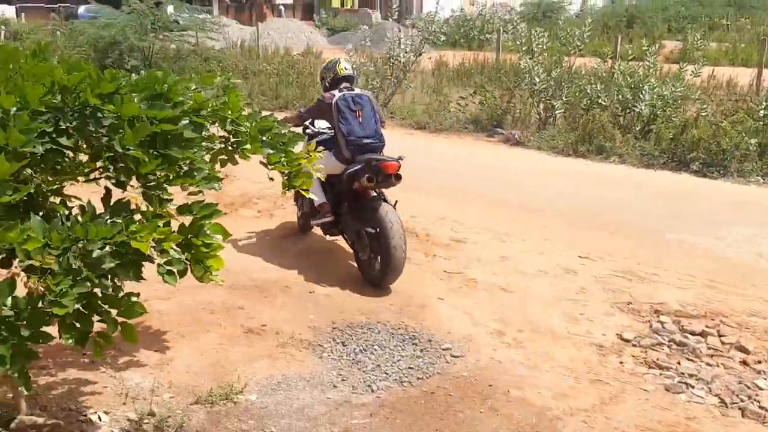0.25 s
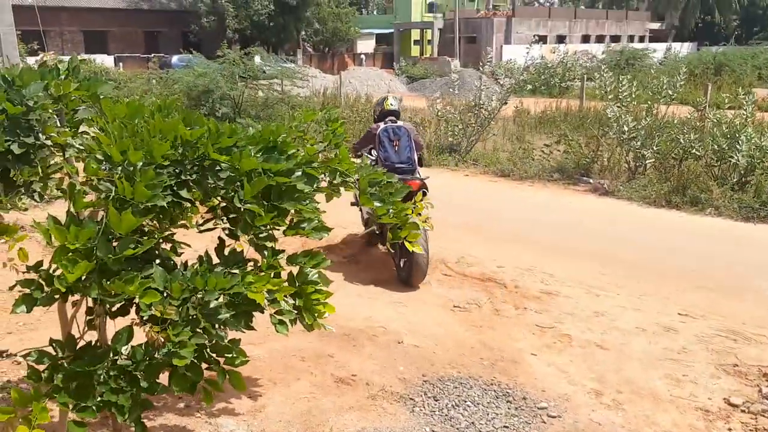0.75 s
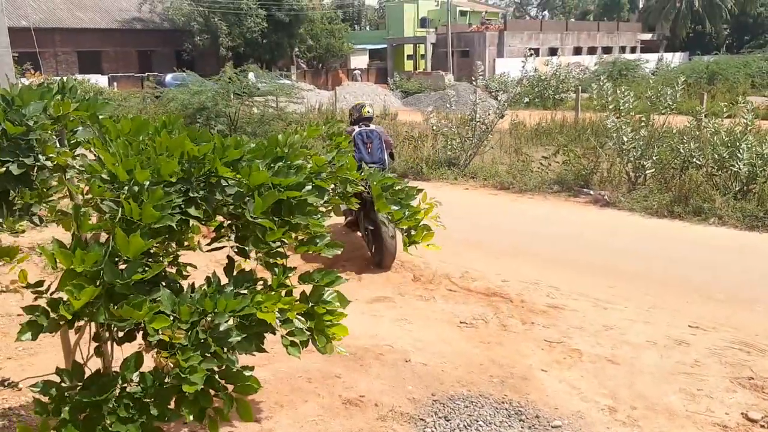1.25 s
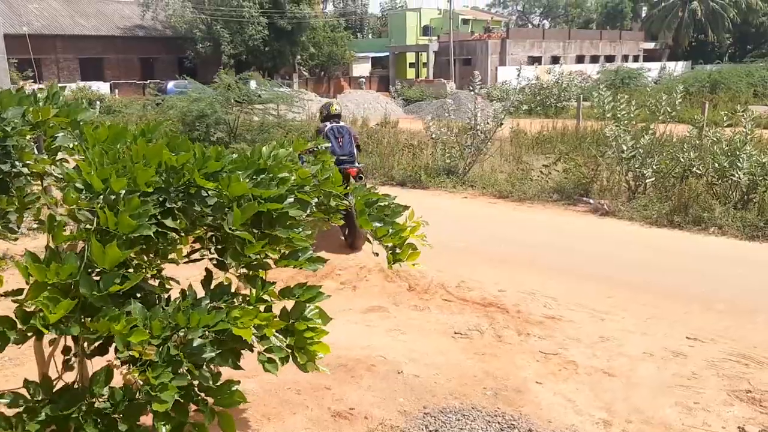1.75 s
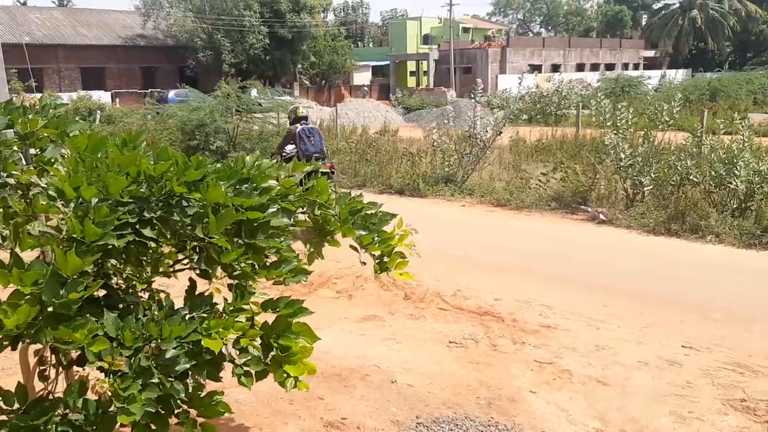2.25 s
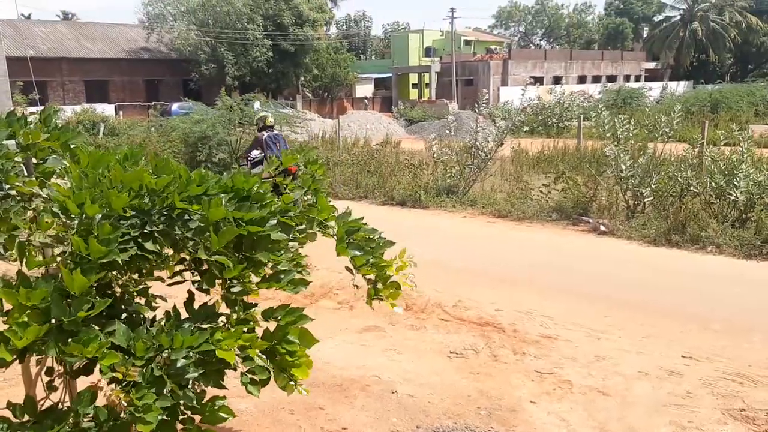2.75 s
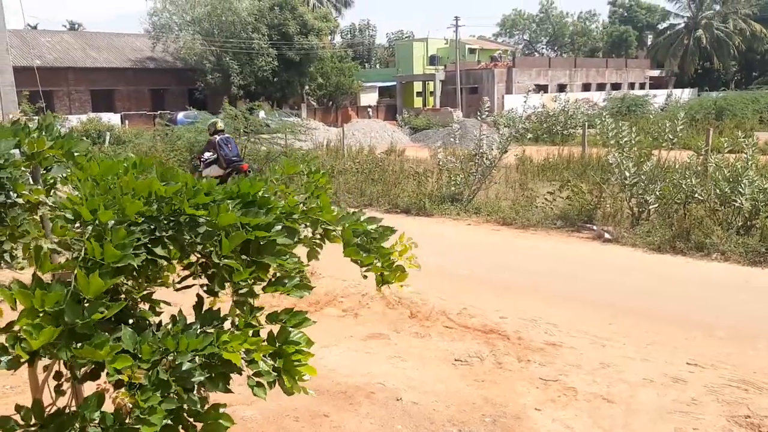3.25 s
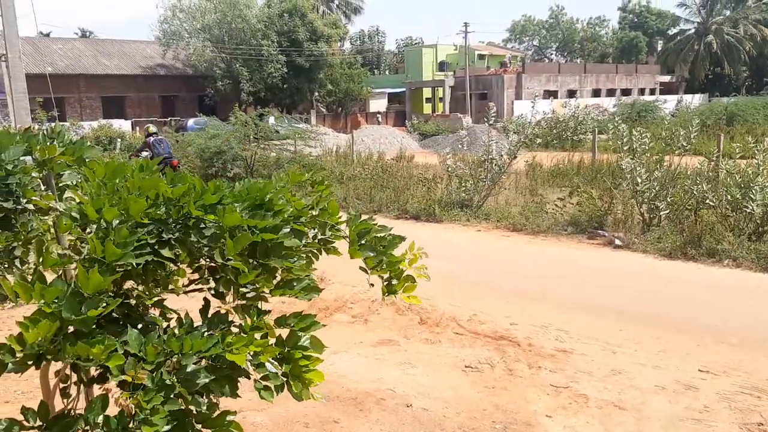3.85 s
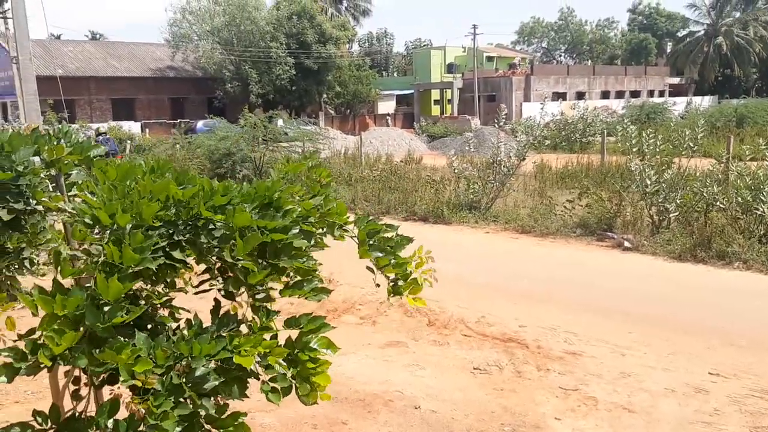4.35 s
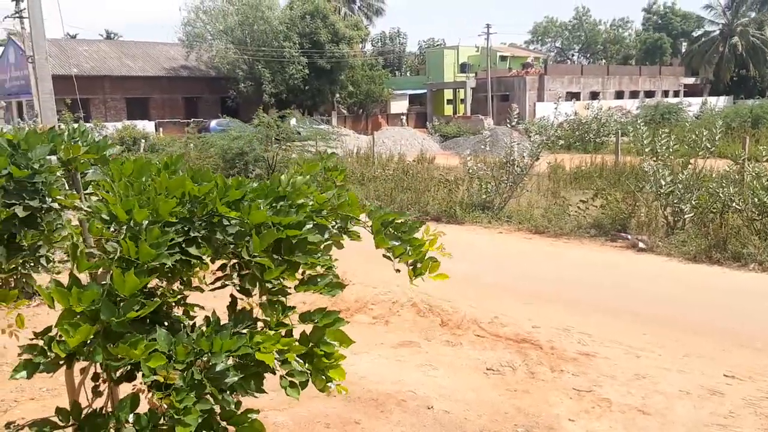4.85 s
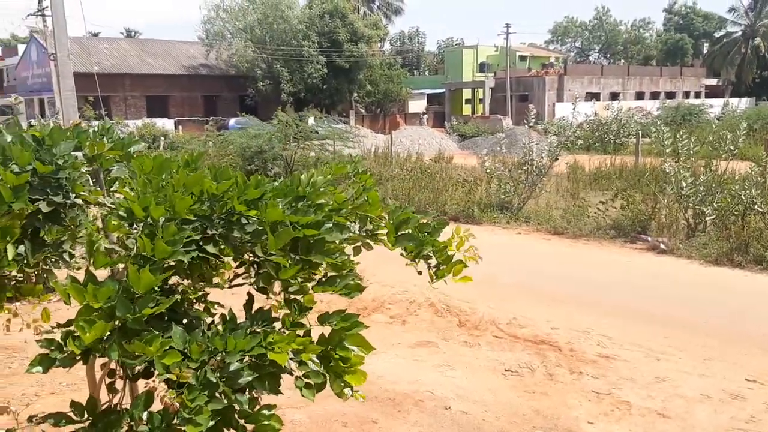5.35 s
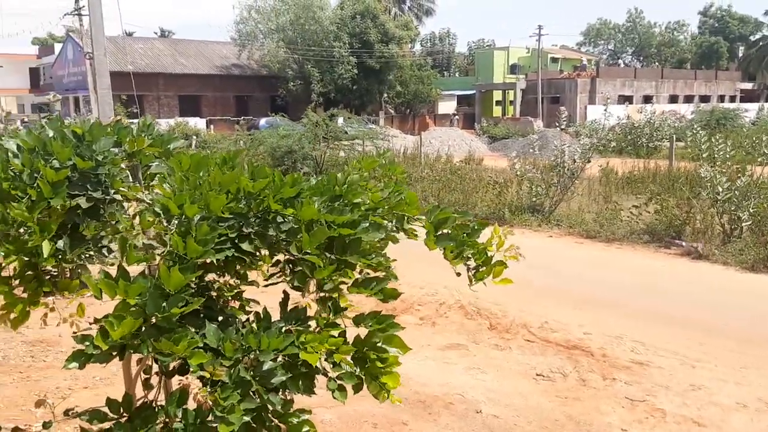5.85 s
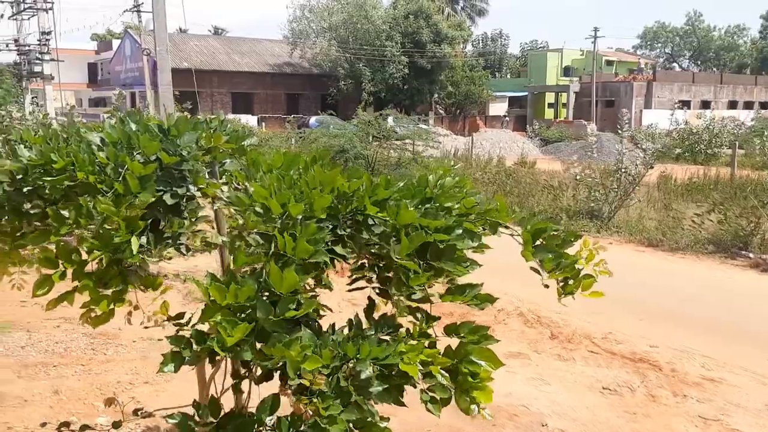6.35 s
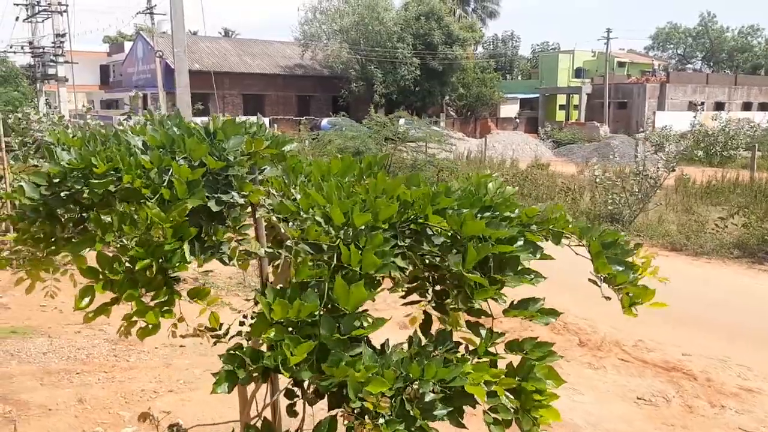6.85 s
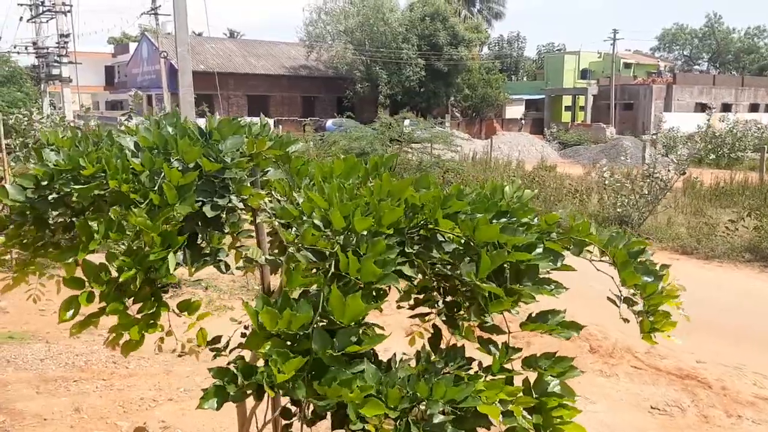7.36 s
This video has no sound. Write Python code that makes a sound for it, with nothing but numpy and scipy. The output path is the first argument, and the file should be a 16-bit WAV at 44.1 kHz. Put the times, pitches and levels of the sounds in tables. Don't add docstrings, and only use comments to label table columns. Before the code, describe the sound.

Beside an open dirt road, a big four-cylinder bike barks and pops, settles into a limping idle, whines lightly as the clutch bites, then roars off to the left. Engine pitch rises, drops suddenly at a gear change, and climbs higher to the end, coarse and sizzling. Light leaf rustle, a few grit ticks and small bird whistles sit underneath; the slightly band-limited stereo microphones are close at first.

```python
import sys
import numpy as np
from scipy import signal
from scipy.fft import rfft, irfft, next_fast_len
from scipy.io import wavfile
from scipy.ndimage import uniform_filter1d, map_coordinates

SR = 44100
rng = np.random.default_rng(int(sys.argv[2]) if len(sys.argv) > 2 else 0)


def transcribe(signal):
    frames = np.atleast_2d(signal).T
    limited = np.clip(frames, -1, 1)
    pcm = np.round(limited * 32767).astype(np.int16)
    wavfile.write(sys.argv[1], SR, pcm)


def linear_from_db(decibels):
    return 10 ** (np.asarray(decibels, float) / 20)


N = 336042
MIDDLE_HZ = 125.6


def unit(x):
    return x / np.sqrt(np.mean(x ** 2) + 1e-20)


def along(points, hz):
    f, value = np.transpose(points)
    return np.interp(np.log(hz + 1), np.log(f + 1), value)


def curves(rows):
    s, *columns = np.transpose(rows)
    return [np.interp(np.arange(N) / SR, s, column) for column in columns]


def wobble(rate):
    knots = rng.standard_normal(int(N * rate / SR) + 4)
    return map_coordinates(knots, [np.arange(N) * rate / SR])


def swells(rows, roundness=1):
    out = np.zeros(N)
    for s, length, size in rows:
        at = np.arange(max(int(s * SR) + 1, 0), min(int((s + length) * SR), N))
        out[at] += size * np.abs(np.sin(np.pi * (at / SR - s) / length)) ** roundness
    return out


def level_swells(rows, roundness):
    return swells([(s, length, linear_from_db(db)) for s, length, db in rows], roundness)


def causal(spectrum, size):
    cepstrum = irfft(np.log(linear_from_db(along(spectrum, np.fft.rfftfreq(size, 1 / SR))) + 1e-6), size)
    cepstrum[1:size // 2] *= 2
    cepstrum[size // 2 + 1:] = 0
    return np.exp(rfft(cepstrum))


def coloured(x, spectrum):
    m = 2 * next_fast_len(N // 2 + 8192)
    return unit(irfft(rfft(x, m) * causal(spectrum, m), m)[..., :N])


def steady(x, span_s=0.17):
    return x / np.sqrt(np.abs(uniform_filter1d(x ** 2, int(span_s * SR))) + 1e-12)


# start_s, firings_hz
SPEED = [(0, 77.45), (.08, 82), (.23, 83.17), (.42, 99.74), (.66, 94.9), (.78, 67.36), (.93, 53.34),
         (1.3, 55.44), (2.93, 54.37), (3.14, 65.28), (4.55, 130.9), (5.22, 170.5), (5.29, 166),
         (5.44, 137.3), (5.54, 110.7), (5.67, 121.2), (6.1, 139), (7.62, 191.1)]
# start_s, length_s, extra_hz
SURGES = [
    (2.39, 0.51, 27.5),
    (2.96, 0.16, 6.4),
    (3.1, .5, 2.5),
    (5.53, .13, 18),
]


def crank():
    hz = curves(SPEED)[0] + swells(SURGES)
    return hz, np.cumsum(hz * (1 + .002 * wobble(20))) / SR


# start_s, throttle (0-1), pulse_db, orders_over_two_db, gas_db, unlike_cylinders_db
EFFORT = [(0, 0.56, -16, 0, -44.5, -16), (.25, 0.97, -13, -3.5, -49, -12),
          (.33, 0.5, -14.5, -1, -30.5, -3.5), (.655, 0.6, -16.5, 7.5, -37.5, -2.5),
          (.675, 0, -19, -4, -46.5, -10), (2.38, 0, -15.5, 2, -45, -4.5), (2.5, 0.29, -20.5, 4, -47, -30.5),
          (2.75, 0.14, -19, 1, -44, -17.5), (2.92, 0, -27.5, 2, -47.5, -10),
          (3.08, 0, -22.5, 1.5, -45, -11.5), (3.62, 0.24, -18.5, 4, -38, -8),
          (4.3, 0.94, -19.5, -1, -33, -3), (5.22, 0.6, -11.5, 5.5, -31, -16),
          (5.31, 0.49, -20.5, -6, -44, -3.5), (5.52, 0.07, -23.5, 2, -49, 1),
          (5.7, 0.92, -25.5, 5, -43.5, -1.5), (6.5, 0.76, -14.5, -10.5, -34, -16),
          (7.62, 1, -13.5, -7.5, -34.5, -11)]


# start_s, length_s, pitch_hz, level_db
LINE_SWELLS = [(.1, 0.91, 228, -5.5), (.25, 1, 350, -13), (3.5, 0.7, 209, -8), (3.76, 0.5, 322, 5),
                (4.52, 0.3, 560, -11), (4.83, 0.38, 300, -0.5), (5.9, 0.55, 280, 5), (6.03, 0.44, 410, -7.5),
                (6.26, 0.49, 380, 6), (4.15, .45, 500, 5), (4.8, 0.5, 655, 15), (5.62, 0.45, 640, 12),
                (6.45, 0.45, 330, 4), (6.95, 0.39, 160, 4), (2.55, .3, 210, 2), (5.28, 0.26, 243, -10),
                (3.2, .6, 465, -7), (6.8, .72, 566, -7), (.72, .16, 125, -5.5), (2.856, 0.35, 293, 5),
                (6.2, 0.55, 600, 19), (6.66, 0.45, 665, 18), (6.45, .38, 480, 5), (4.22, .36, 625, 6),
                (3.22, .2, 290, -4), (2.55, .3, 270, 3), (5.38, .16, 132, -6), (5.52, .13, 385, 7),
                (5.5, .09, 230, -7), (6.82, .3, 500, -7), (7.3, .25, 360, -2), (4.72, .4, 430, 2),
                (6.85, .22, 830, 5), (0, .3, 245, 3), (.27, .22, 290, 4), (0, .5, 170, -3), (5.08, .18, 340, 3),
                (5.27, .14, 150, 4), (5.58, .07, 270, 4), (5.1, .2, 505, -4), (3.2, .35, 340, 2),
                (.47, .2, 295, -3), (6.85, .85, 265, -9), (4.1, .16, 340, 3), (7.2, .3, 725, 6),
                (3.9, .35, 440, 3), (6.05, .27, 275, 2), (6.9, .2, 170, 2), (6.1, .25, 700, -6),
                (6.3, .16, 295, -7), (6.49, .06, 305, -9), (6.63, .045, 315, -8), (6.705, .04, 320, -6),
               (6.765, .05, 325, -7), (6.92, .06, 335, -4), (6.58, .085, 155, -9), (6.725, .07, 160, -7),
               (6.86, .065, 165, -5), (6.35, .06, 445, -12), (6.465, .03, 455, -6), (6.53, .03, 460, -6),
               (6.65, .045, 475, -12), (6.495, .04, 610, -8), (5.06, .045, 320, -10), (5.655, .05, 125, -9),
               (5.65, .06, 250, -5), (4.23, .1, 345, -3), (5.25, .05, 320, -10), (5.32, .05, 300, -9),
               (5.26, .14, 240, -7), (5.385, .04, 140, -8), (5.24, .08, 490, -8), (5.26, .03, 165, -7)]


def line_swells(hz):
    out = np.zeros(N)
    for s, length, spot_hz, db in LINE_SWELLS:
        at = np.arange(int(s * SR), min(int((s + length) * SR), N))
        nearness = 1 / (1 + ((hz[at] - spot_hz) / 40.7) ** 4)
        out[at] += db * np.sin(np.pi * (at / SR - s) / length) * nearness
    return out


def chamber(x, lead=True):
    delay_s, echo = .0055, -.17
    taps = np.zeros(int(delay_s * SR) + 1)
    taps[[0, -1]] = 1, echo
    before = 2000 * lead
    return signal.lfilter(taps[::-1], taps, np.pad(x, (before, 0), "reflect"))[before:]


# order, level_db
PATTERN = [(.5, -31.5), (.75, 0), (1.25, -6), (1.5, 0), (1.75, -14.5), (2.25, -5.5), (2.5, -4),
           (2.749, -0.5), (3.251, -4), (3.497, -0.5), (3.75, 2.5), (4.5, 0), (5.501, -14.5)]
ORDER_DB = [0, 0, 0, -1]
# pitch_hz, level_db
PIPE = [(20, -47.5), (50, -12), (90, -15.5), (130, 1), (175, -11.5), (250, 2), (320, -7.5), (400, -6),
        (470, -9.5), (560, -33.5), (900, -48), (2000, -66.5), (8000, -83.5), (20000, -120)]
# pitch_hz, level_db
SHUT = [(300, 1.5), (380, -15), (470, -11.5), (560, -12.5), (900, -13.5)]
# pitch_hz, width_hz, level_db
LENGTHS = [(198.4, 40, 4.5), (370.8, 20, 6), (405, 20, -1.5), (469, 53, 5), (549, 34, -5.5),
           (627, 82, 13.5), (805, 79, -5)]
# start_s, length_s, level_db
STUMBLES = [(.73, 0.05, -14.5), (.083, 0.018, -7), (.152, 0.011, -9), (.27, 0.019, 1.5), (.35, 0.014, -1),
            (.438, 0.027, -5.5), (.52, 0.025, -9.5), (.603, 0.016, -4.5), (.66, 0.083, -9), (2.41, .07, -4),
            (2.74, 0.034, -3), (4.55, 0.42, 0.5), (5.585, 0.075, 5.5), (5.65, 0.065, 1.5),
            (6.31, 0.038, -2.5), (2.42, 0.036, -2.5)]
# start_s, length_s, level_db
HANDOVER = [
    (.775, 1.65, -21),
]
# start_s, length_s, extra_scatter
RAGGED = [
    (.25, .6, 3),
    (3.1, 1.4, 1.5),
    (5.24, .42, 9),
]


def exhaust(turn, hz, chance):
    throttle, pulse_db, over_db, _, unlike_db = curves(EFFORT)
    throttle = np.clip(throttle, 0, 1)
    pulse_db = pulse_db + swells(STUMBLES) + swells(HANDOVER, 1 / 8)
    scatter = 3 - 1.5 * throttle + swells(RAGGED, .5)
    grid_hz = np.fft.rfftfreq(8192, 1 / SR)
    lag = np.unwrap(np.angle(causal(PIPE, size=8192)))
    scale_hz = np.arange(2500)
    standing_db = sum(db * np.exp(-((scale_hz - f) / width) ** 2) for f, width, db in LENGTHS)

    def line(k, db):
        drift = .1 * scatter * wobble(28)
        return linear_from_db(db) * np.cos(2 * np.pi * k * turn + np.interp(k * hz, grid_hz, lag) + drift)

    def pipe_db(f):
        return along(PIPE, f) + (1 - throttle) * along(SHUT, f)

    def order_db(k):
        db = line_swells(k * hz) + pulse_db + over_db * (k > 2)
        db = db - 4.5 * throttle * (k > 3)
        return db + pipe_db(k * hz) + np.interp(k * hz, scale_hz, standing_db)

    tone = np.zeros(N)
    for k, db in enumerate(ORDER_DB, 1):
        tone += np.sqrt(2) * line(k, db + order_db(k) + np.sqrt(scatter) * wobble(14))
    for k in range(5, 11):
        flicker_db = 3.5 * wobble(5.02)
        tone += line(k, -2 - 3.5 * (k - 5) + order_db(k) + flicker_db)
    for k, db in PATTERN:
        tone += line(k, pulse_db + unlike_db + line_swells(k * hz) / 2 + db + pipe_db(k * hz))

    weak = .55 - np.clip(chance[:, 0] + .3, 0, 1.8)
    burns = np.diff(np.floor(turn), prepend=0) * weak[turn.astype(int)]
    dull_pipe = [(f, db + along(SHUT, f)) for f, db in PIPE]
    ring = throttle * coloured(burns, PIPE) + (1 - throttle) * coloured(burns, dull_pipe)
    uneven_db = pulse_db - 14 + 8 * (1 - throttle) - 11 * np.log2(hz / MIDDLE_HZ)
    return chamber(-tone - linear_from_db(uneven_db) * steady(ring))


# start_s, firing_number
IDLE = [(.8009, -7), (.8625, -3), (.9161, 0), (.9725, 3), (1.1435, 12), (1.2351, 17), (1.3234, 22),
        (1.4327, 28), (1.5077, 32), (1.6983, 42), (1.8128, 48), (1.8695, 51), (2.1453, 66), (2.385, 79),
        (2.4035, 80)]
TWO_CYCLES = [1, 3, -2.5, 5.5, 2.5, -12.5, 0, 4]
# start_s, level_db
ODD_BURNS = [(.816, -13), (.832, -8.5), (.847, -8.5), (.8625, 16), (.88, -13.5), (.898, -14), (.953, 2.5),
             (.991, -13.5), (1.01, 13), (1.049, -22.5), (1.107, -1), (1.162, 7), (1.198, -14),
             (1.342, -27.5), (1.488, -12.5), (1.622, -2.5), (1.66, -4), (1.905, 11.5), (1.96, -1.5),
             (2.053, 12.5), (2.108, -3), (2.404, -2), (.801, 2), (.916, 2), (.935, 2.5), (.9725, -1.5),
             (1.088, 2), (1.565, -1.5), (1.735, 2), (1.79, 0), (1.831, -3), (1.85, 3), (1.996, 3.5),
             (2.034, -2.5), (2.145, 4), (2.182, 3), (2.24, -5.5), (2.275, -2.5), (2.31, 1), (2.385, 2.5),
             (1.394, 1), (1.925, 0.5), (2.2, -5), (2.257, -1.5), (2.35, -5.5)]
# start_s, peak_db
IDLE_DB = [(.8, -12.5), (1.7, -13), (1.9, -11), (2.4, -10.5)]
# pitch_hz, level_db
IDLE_PIPE = [(20, -45.5), (52, -11), (90, -14), (122, -3), (170, -12.5), (212, -2.5), (230, -0.5), (243, 4),
             (257, -2.5), (278, -7), (320, -18), (400, -32), (540, -43.5), (3000, -96.5)]
# pitch_hz, level_db_per_hz
IDLE_GAS = [(250, -40), (330, 2), (380, 1), (460, -4.5), (530, -21), (900, -36), (2000, -120)]


def idle():
    s, number = np.transpose(IDLE)
    every = np.arange(number[0], number[-1] + 1).astype(int)
    at_s = np.interp(every, number, s)
    size_db = np.take(TWO_CYCLES, every, mode="wrap") + np.interp(at_s, *np.transpose(IDLE_DB))
    size_db = size_db + .7 * rng.standard_normal(len(at_s))
    for when, db in ODD_BURNS:
        size_db[np.argmin(np.abs(at_s - when))] += db
    thump = chamber(-irfft(causal(IDLE_PIPE, size=8192)), lead=False)
    burns = np.bincount((at_s * SR).astype(int) - np.argmax(thump), linear_from_db(size_db), N)
    gas_t60_s = 0.15
    decay = linear_from_db(-60 * np.arange(SR // 8) / SR / gas_t60_s)
    puffs = signal.fftconvolve(burns, decay)[:N] * rng.standard_normal(N)
    return signal.fftconvolve(burns, thump / thump.max())[:N] + linear_from_db(-45.5) * coloured(puffs, IDLE_GAS)


# pitch_hz, level_db_per_hz
ROAR = [(400, -23), (540, 3), (680, -6.5), (850, -4.5), (980, -6.5), (1080, -8), (1260, -9), (1400, -14),
        (1700, -21), (3000, -120)]
RASP = [(900, -120), (1250, -26), (1400, -8), (1510, -3), (1700, -6), (2020, 0), (2250, -5), (2800, -18),
        (3500, -120)]
SIZZLE = [(1500, -120), (2200, -35.5), (2450, -1), (2750, 4), (3100, 1.5), (3700, -3), (4600, -4.5),
          (5200, -11.5), (6300, -17), (7300, -13), (8000, -17), (8600, -43.5), (12000, -120)]
# pitch_hz, level_db_per_hz
BAFFLE = [(450, -60), (570, -14), (660, 0), (760, -12), (1000, -60)]
BARK = [(700, -120), (950, -14), (1080, -8), (1250, 0), (1370, -8), (1500, -2), (1700, -20), (2500, -22),
        (2800, -8), (3100, -26), (4000, -120)]
SHIELD = [(2200, -120), (2800, -20), (3050, -6), (3350, -20), (4200, -16), (4600, 0), (4950, -14),
          (5800, -12), (7200, -16), (8300, -40), (9500, -120)]
# start_s, length_s, level_db
RATTLES = [
    (-.3, 3.2, 10),
    (.28, .42, 9),
    (5.22, .36, 11),
    (5.55, .8, 12),
]
# start_s, length_s, level_db
CRACKS = [
    (0, 0.3, 11.5),
    (3.63, 0.046, 8),
    (4.83, 0.38, 8),
    (6.35, 0.62, 1),
    (6.88, .2, 3),
    (7.1, .7, 2),
    (7.49, 0.33, 4),
]
# start_s, length_s, level_db
RASPS = [
    (6.29, 0.8, 3.5),
    (6.74, 0.2, 1.5),
    (7.06, 0.89, -3.5),
    (4.95, .33, 1),
]
# start_s, length_s, level_db
BARKS = [
    (3.6, .6, -54),
    (4.2, .62, -48),
    (4.8, .45, -50),
    (6.28, .4, -52),
    (6.6, .68, -50),
]
# start_s, length_s, level_db
RINGS = [
    (4.83, .3, -49.5),
    (5.1, .14, -55),
    (6.88, .19, -56),
    (7.17, .1, -57),
    (7.35, .3, -58),
    (7.495, .25, -49),
]


def jet(turn, chance):
    throttle, _, _, gas_db, _ = curves(EFFORT)
    baffle_db = -12 + swells(RATTLES, .4)
    crack_db = swells(CRACKS, 0.1)
    octaves = np.log2(curves(SPEED)[0] / MIDDLE_HZ)
    shock_db = -14 + 8 * throttle + crack_db
    roar_db = gas_db + 0.049 * crack_db
    rasp_db = gas_db - 12 + 15.5 * octaves + 0.65 * crack_db + swells(RASPS, 0.41)
    sizzle_db = gas_db - 9.5 + 9.5 * octaves + crack_db
    count = turn.astype(int)
    size = linear_from_db(330 / (np.gradient(turn) * SR) * np.tanh(chance[count, 1]))
    steep = linear_from_db(9 * (count % 2))
    front = np.diff(count, prepend=0) * size

    def puff(depth):
        envelope = 1 - depth + depth * size * np.exp(-3.5 * (turn % 1))
        return envelope * rng.standard_normal(N)

    def layer(noise, fronts, db, tint):
        return steady(coloured(noise, tint)) + linear_from_db(db) * steady(coloured(fronts, tint))

    def rung(rows, tint):
        fronts = np.sign(front) * size ** .5 * steep
        return level_swells(rows, .3) * steady(layer(puff(.9) * steep, fronts, 9, tint))

    roar = layer(puff(.7), front * steep ** .3, shock_db + 9, ROAR)
    baffle = layer(puff(.7), front, -2, BAFFLE)
    roar = steady(roar) + linear_from_db(baffle_db) * steady(baffle)
    rasp = layer(puff(.8) * steep ** .4, front * steep ** .6, shock_db + 9, RASP)
    sizzle = layer(puff(.85) * steep ** .7, front * steep, shock_db + 4, SIZZLE)
    out = rung(BARKS, BARK) + rung(RINGS, SHIELD)
    for db, x in zip((roar_db, rasp_db, sizzle_db), (roar, rasp, sizzle)):
        out += linear_from_db(db - 4.5) * steady(x)
    return out


# start_s, peak_db
POPS = [(0.074, -22), (0.172, -24), (0.253, -25), (0.311, -18.5), (0.343, -31), (0.365, -22), (0.386, -17),
        (0.426, -23.5), (0.466, -17.5), (0.507, -21.5), (0.547, -13.5), (0.598, -16.5), (0.639, -15.5),
        (0.828, -32), (0.859, -32), (2.484, -31), (2.512, -39.5), (2.564, -26.5), (2.614, -31.5),
        (3.654, -26), (3.751, -27), (3.783, -31), (3.903, -32), (5.556, -31), (5.618, -33)]
# pitch_hz, level_db, t60_s
POP_MODES = [(553, -2.5, 0.052), (675.4, -3.5, 0.065), (839, -11, .05)]
# start_s, pitch_hz, peak_db
PINGS = [(.393, 1230, -39), (.471, 1220, -31.5), (.551, 1228, -37), (.608, 1225, -45), (.643, 1240, -46),
         (.062, 2760, -40), (.11, 2620, -33.5), (.123, 1980, -39), (.15, 1810, -41), (.197, 1950, -43),
         (.246, 2005, -41), (.272, 2020, -41), (.342, 1990, -43), (.37, 2000, -43), (2.157, 2630, -42.5),
         (2.21, 2440, -46)]


def pops():
    out, t = np.zeros(N), np.arange(SR // 10) / SR

    def ring(hz, db, t60_s, rise_s):
        return linear_from_db(db - 60 * t / t60_s) * (1 - np.exp(-t / rise_s)) * np.sin(2 * np.pi * hz * t)

    for (s, db), luck in zip(POPS, rng.standard_normal((len(POPS), 6))):
        for k, (hz, level, t60_s) in enumerate(POP_MODES):
            mode = ring(hz * (1 + .04 * luck[k]), db + level - 2.5 + 2 * luck[k + 3], t60_s, .001)
            out[round(s * SR):][:len(t)] += mode
    for s, hz, db in PINGS:
        out[round(s * SR):][:len(t)] += ring(hz, db + 6.0, 0.051, 0.0024)
    return out


# start_s, length_s, level_db
WHINE = [(2.44, .41, -52), (2.48, .06, -53), (2.6, .14, -55), (2.74, .09, -54), (3.0, .15, -54),
         (3.14, .42, -47), (3.16, .17, -52), (3.74, .4, -57)]


def gears(turn):
    load = level_swells(WHINE, .35)
    return load * linear_from_db(3 * wobble(30)) * np.sin(2 * np.pi * 22 * turn + .9 * wobble(90))


# start_s, left_lead_samples, left_over_right_db
LEAD = [(0, 0.75, 1), (2.5, 0.5, 0.3), (3.7, 3.5, -0.5), (5, 7.86, -1), (5.6, 7, -1), (6.3, 7, -0.5),
        (7.62, 10.26, -1)]


def ports(x):
    lead, pan_db = curves(LEAD)
    sides = []
    for side in (.5, -.5):
        shifted = map_coordinates(x, [np.arange(N) + side * lead], mode="nearest")
        sides.append(linear_from_db(side * pan_db) * shifted)
    return np.array(sides)


# pitch_hz, t60_s
WALLS = [(100, 0.21), (600, 0.77), (3000, 0.32), (10000, 0.048)]


def walls(x):
    hz, t, z = signal.stft(rng.standard_normal((2, SR // 2)), SR, nperseg=256)
    tail = signal.istft(z * linear_from_db(-60 * t / along(WALLS, hz)[:, None]), SR, nperseg=256)[1]
    delayed = np.pad(x, (700, 0))[None]
    return signal.fftconvolve(delayed, tail / np.linalg.norm(tail[0]), axes=1)[:, :N]


# pitch_hz, level_db_per_hz
HISS = [(500, -40.5), (1000, -8), (1300, -7.5), (1900, -1), (2900, -4), (3400, -7), (5800, -7.5),
        (7600, -9.5), (8600, -24.5), (9700, -21), (11200, -16.5), (15800, -16.5)]
# pitch_hz, left_over_right_db
HISS_PAN = [(60, -2.5), (110, 2), (200, -5), (380, -6), (700, -4), (1290, 1.5), (2380, -0.5), (4400, -4.5),
            (8120, 0), (15000, 3)]
# start_s, level_db
BREEZE = [(0, -52), (.5, -54.5), (1.1, -61.5), (2.9, -60), (3.05, -59.5), (4.2, -59), (4.75, -60.5),
          (4.87, -54.5), (5.2, -58.5), (5.4, -63.5), (6.0, -62), (6.3, -66), (7.62, -58)]
# start_s, length_s, level_db
GUSTS = [(1.32, 0.085, 7.5), (5.3, 0.055, 4), (6.1, 0.11, 3.5), (5.6, 0.45, 1), (7.14, 0.13, 6),
         (3.55, 0.53, 2), (7.3, .25, 0)]
# start_s, peak_db
TICKS = [(0.1354, -38.5), (0.4266, -35.5), (1.14, -39.5), (1.467, -45.5), (1.502, -46), (1.582, -41),
         (1.918, -47.5), (1.731, -45.5), (4.8444, -25.5), (5.3158, -33.5), (7.225, -44)]


def air():
    noise = rng.standard_normal((2, N)) + 0.38 * rng.standard_normal(N)
    m = next_fast_len(N)
    tilt = linear_from_db(np.outer([.5, -.5], along(HISS_PAN, np.fft.rfftfreq(m, 1 / SR))))
    hiss = irfft(rfft(coloured(noise, HISS), m) * tilt, m)[:, :N]
    ticks, t = np.zeros(N), np.arange(400) / SR
    for s, db in TICKS:
        click = np.diff(rng.standard_normal(len(t) + 1))
        ticks[round(s * SR):][:len(t)] += linear_from_db(db - 10.0 - 60 * t / .006) * click
    rustle_db = .5 * wobble(12) + 1.3 * wobble(90)
    return linear_from_db(curves(BREEZE)[0] + swells(GUSTS) + 14.5 + rustle_db) * hiss + ticks


# start_s, length_s, from_hz, to_hz, level_db
BIRDS = [(2.185, .035, 4100, 3350, -60), (3.4, .06, 5900, 6700, -58), (3.78, .045, 5600, 4300, -57),
         (3.8, .035, 3900, 3200, -58), (4.12, .09, 3750, 5050, -51), (4.2, .025, 4550, 4450, -57),
         (4.55, .1, 4850, 4770, -55), (5.705, .045, 5850, 5300, -61), (5.78, .035, 4000, 2900, -61),
         (3.64, .12, 3200, 3230, -56), (3.71, .04, 6500, 6200, -62), (3.615, .065, 2010, 2070, -50),
         (3.66, .11, 2030, 2080, -52)]


def birds():
    out = np.zeros(N)
    for s, length, from_hz, to_hz, db in BIRDS:
        u = np.linspace(0, 1, int(length * SR))
        phase = 2 * np.pi * np.cumsum(from_hz + (to_hz - from_hz) * u) / SR
        out[int(s * SR):][:len(u)] += linear_from_db(db + 7.0) * np.sin(np.pi * u) * np.sin(phase)
    return out * linear_from_db(3 * wobble(70))


def scene():
    hz, turn = crank()
    chance = rng.standard_normal((2000, 2))
    boom = exhaust(turn, hz, chance) + idle()
    bright = jet(turn, chance) + gears(turn)
    direct = ports(boom + bright + pops())
    far = walls(linear_from_db(-21.5) * boom + linear_from_db(-7.5) * bright)
    return direct + far + air() + birds()


def top_cut(x):
    return signal.sosfilt(signal.butter(12, 16880, fs=SR, output="sos"), x)


def record(dry):
    soft = dry / (1 + np.abs(dry / .8) ** 4) ** (1 / 4)
    m = next_fast_len(N)
    hz = np.fft.rfftfreq(m, 1 / SR)
    low_hz, top_hz = 38, 15830
    band = (hz < top_hz) * hz ** 4 / (hz ** 4 + low_hz ** 4)
    mix = irfft(rfft(soft, m) * band, m)[:, :N]
    return top_cut(mix)


dry = scene()
out = record(dry)
transcribe(out)
```